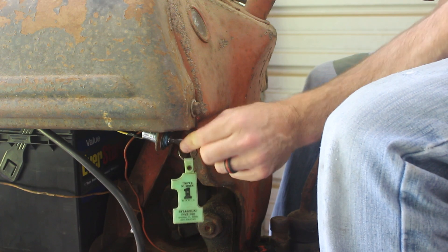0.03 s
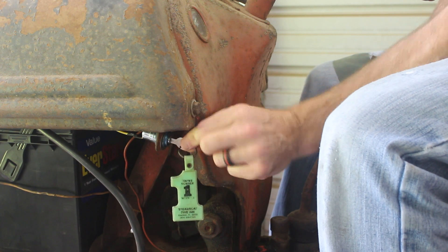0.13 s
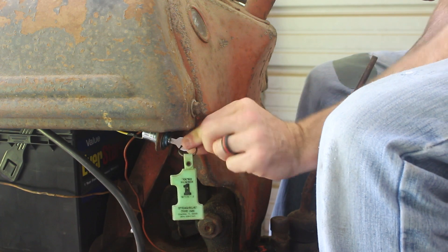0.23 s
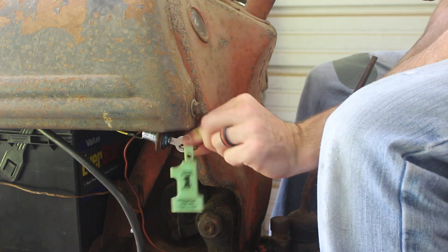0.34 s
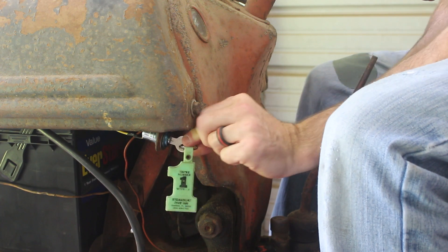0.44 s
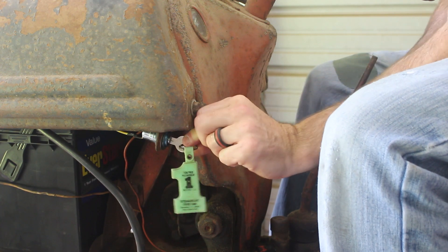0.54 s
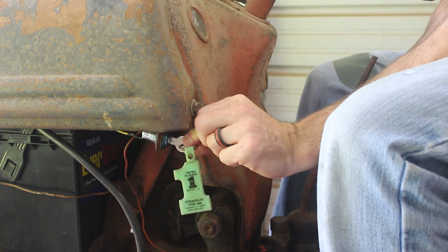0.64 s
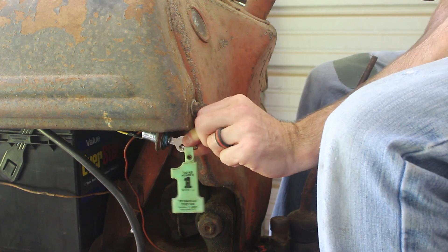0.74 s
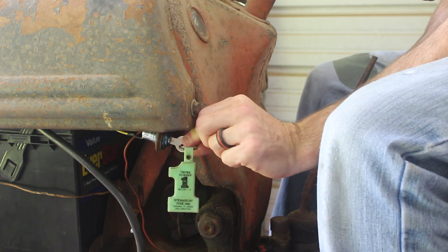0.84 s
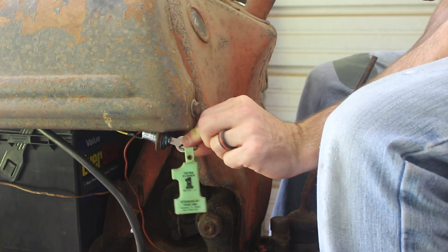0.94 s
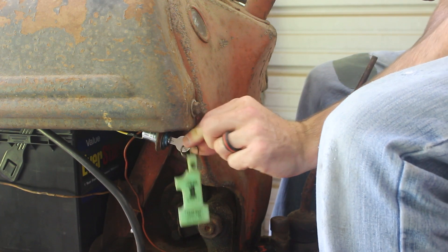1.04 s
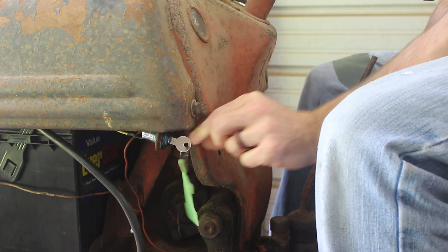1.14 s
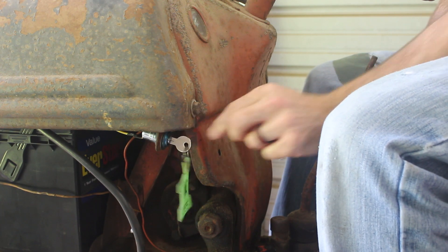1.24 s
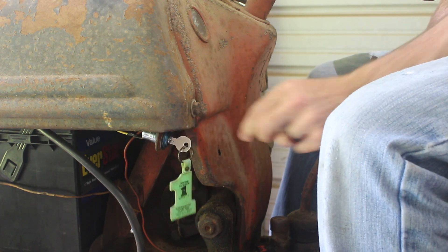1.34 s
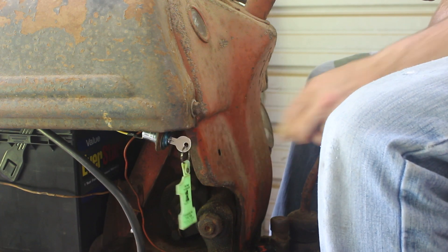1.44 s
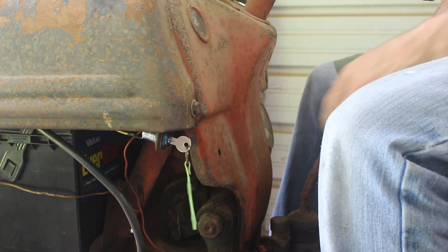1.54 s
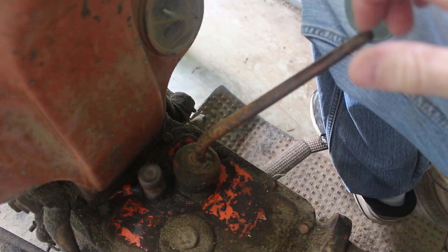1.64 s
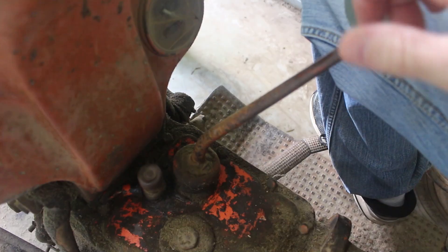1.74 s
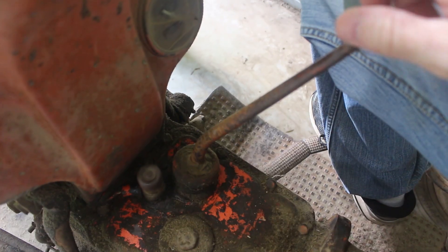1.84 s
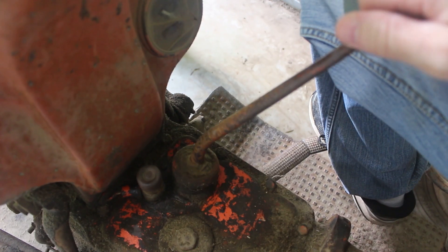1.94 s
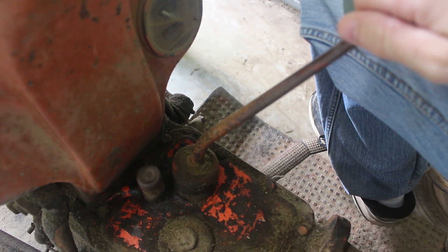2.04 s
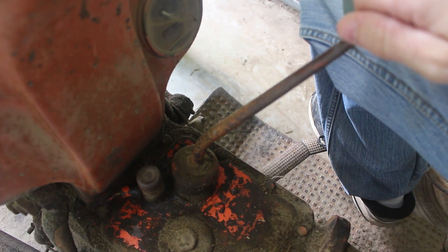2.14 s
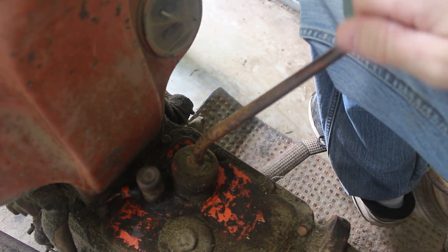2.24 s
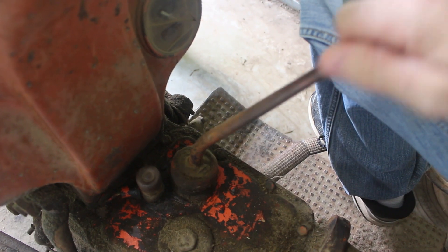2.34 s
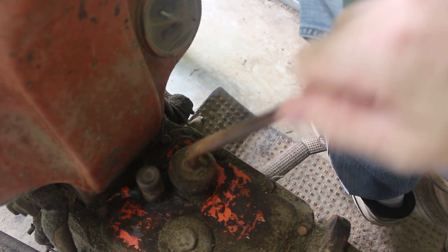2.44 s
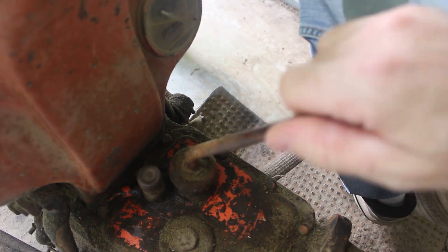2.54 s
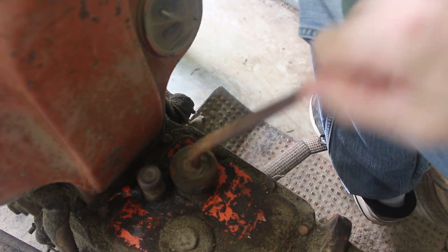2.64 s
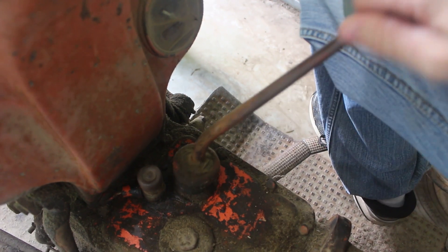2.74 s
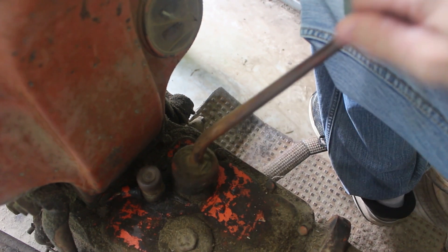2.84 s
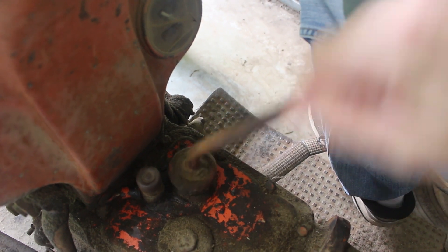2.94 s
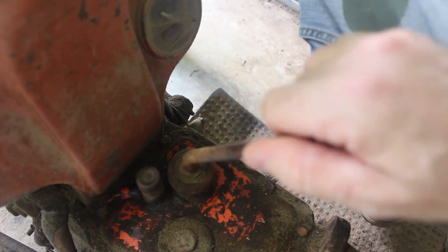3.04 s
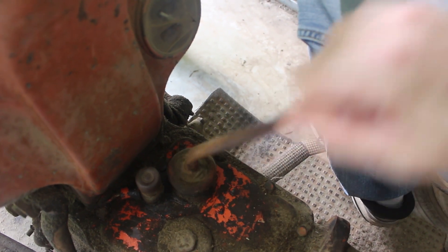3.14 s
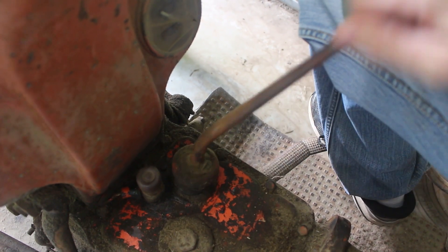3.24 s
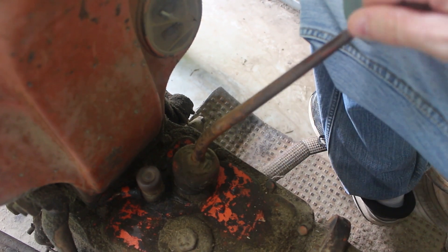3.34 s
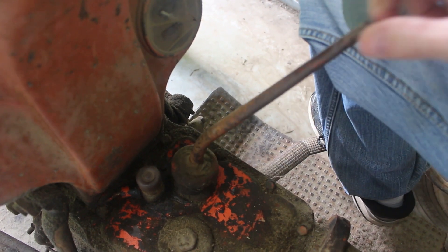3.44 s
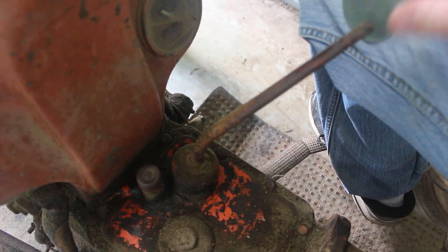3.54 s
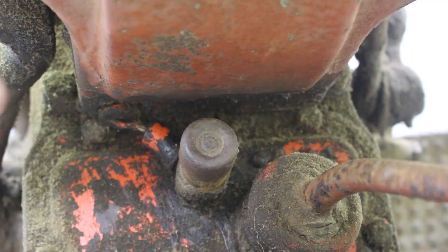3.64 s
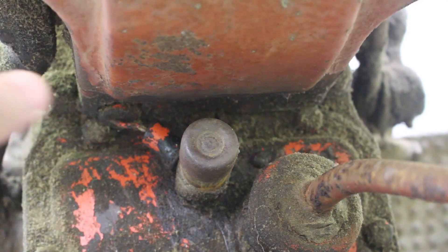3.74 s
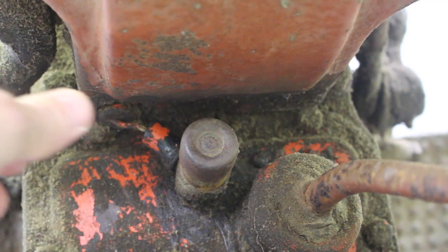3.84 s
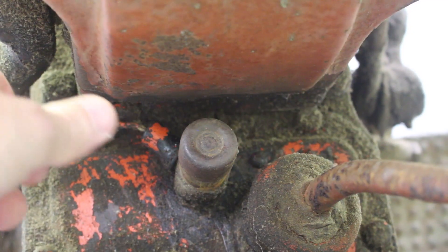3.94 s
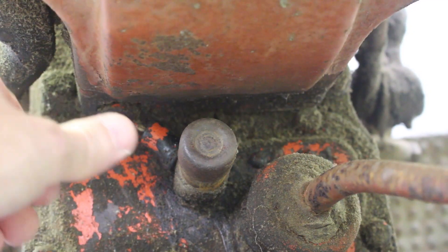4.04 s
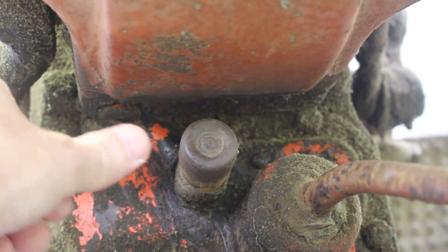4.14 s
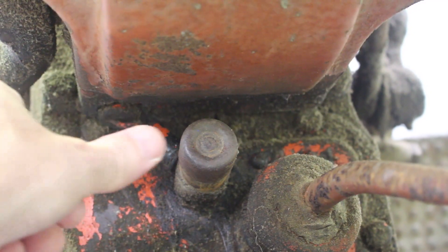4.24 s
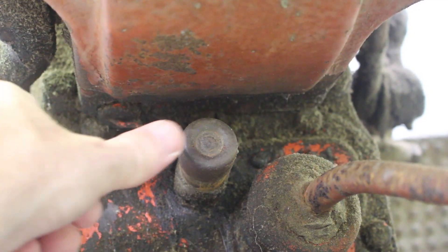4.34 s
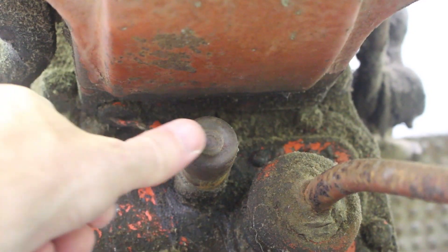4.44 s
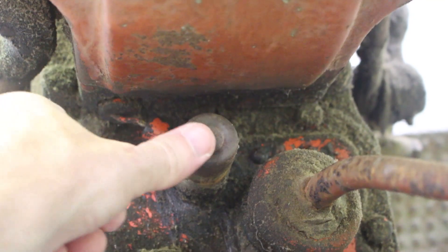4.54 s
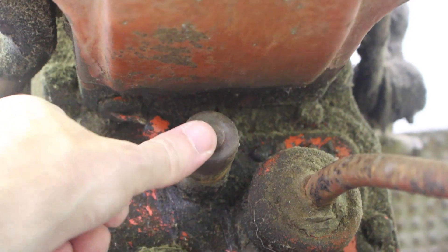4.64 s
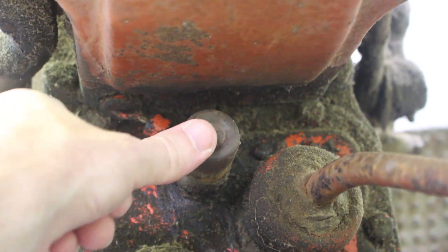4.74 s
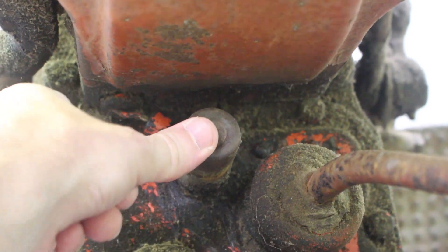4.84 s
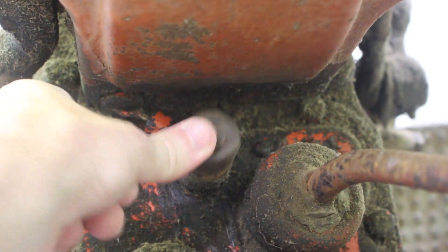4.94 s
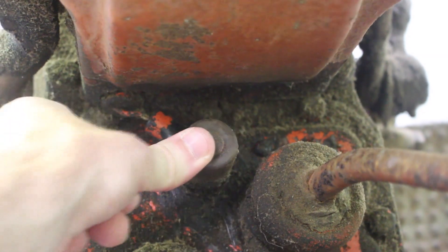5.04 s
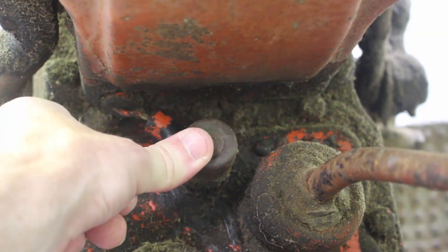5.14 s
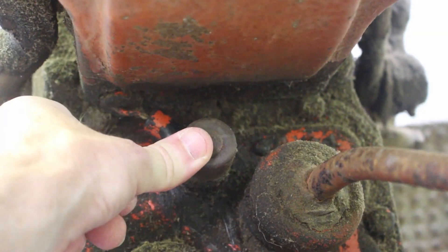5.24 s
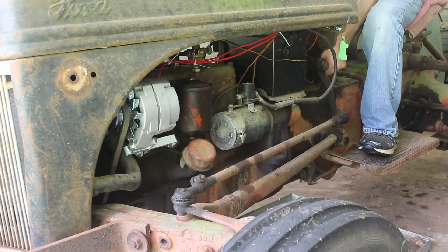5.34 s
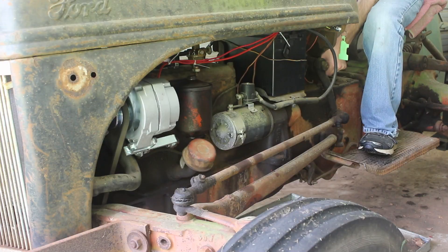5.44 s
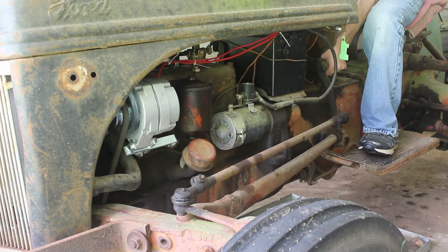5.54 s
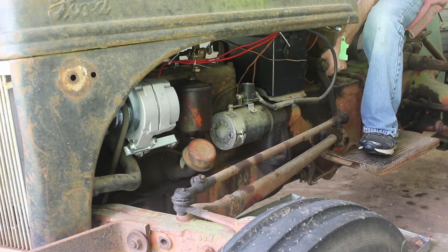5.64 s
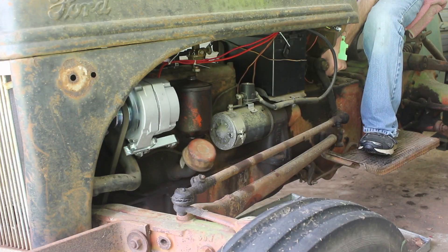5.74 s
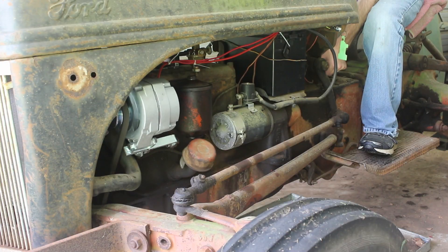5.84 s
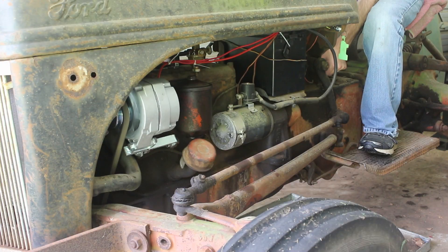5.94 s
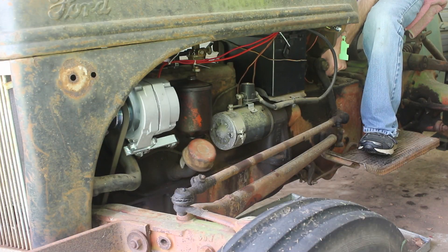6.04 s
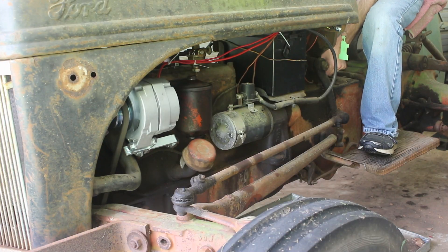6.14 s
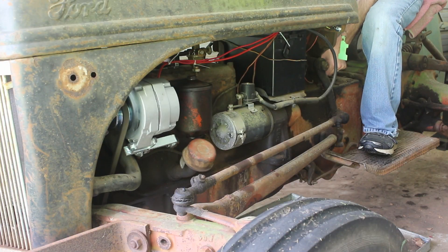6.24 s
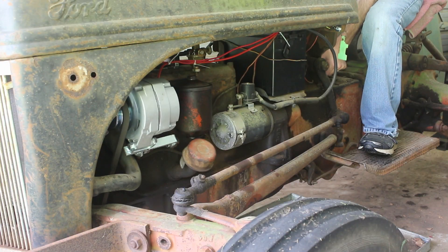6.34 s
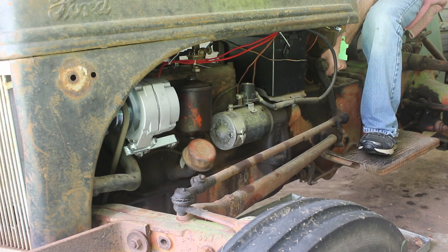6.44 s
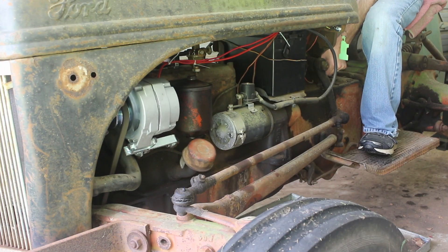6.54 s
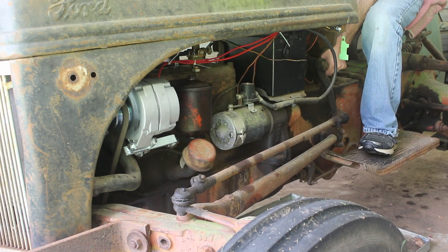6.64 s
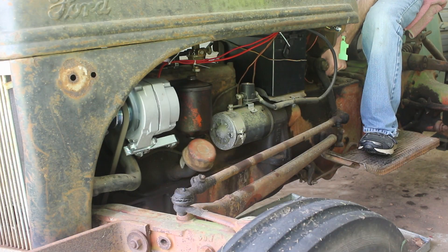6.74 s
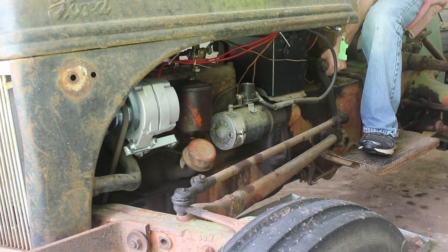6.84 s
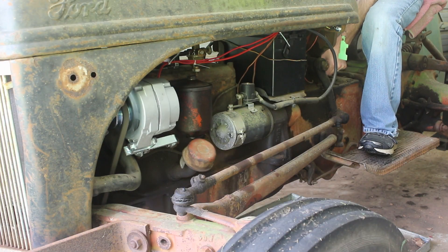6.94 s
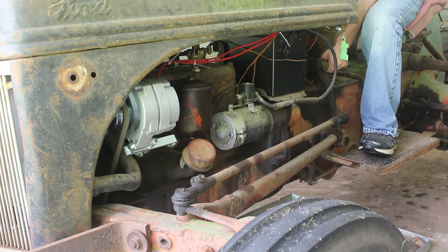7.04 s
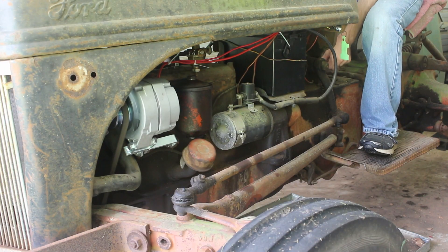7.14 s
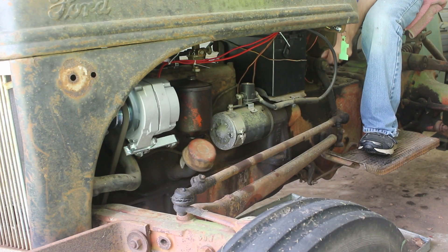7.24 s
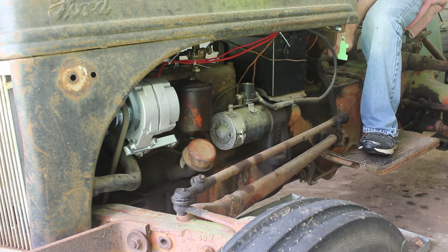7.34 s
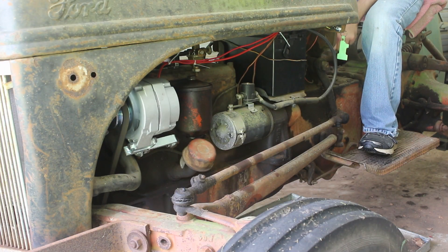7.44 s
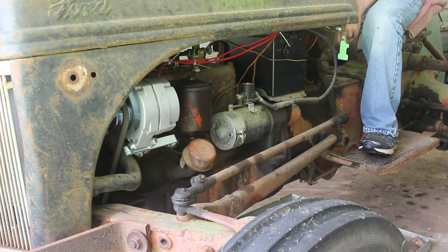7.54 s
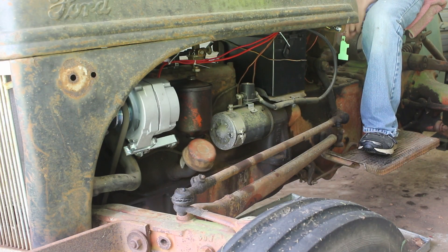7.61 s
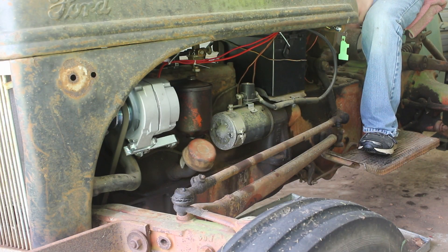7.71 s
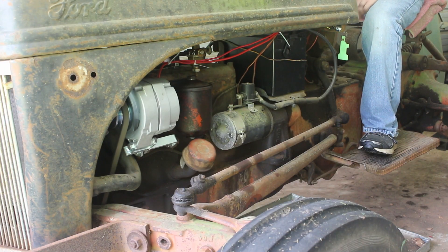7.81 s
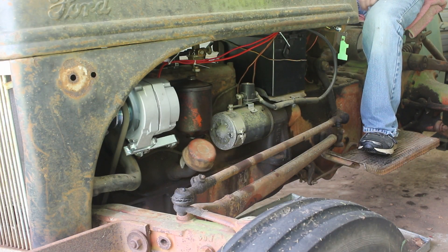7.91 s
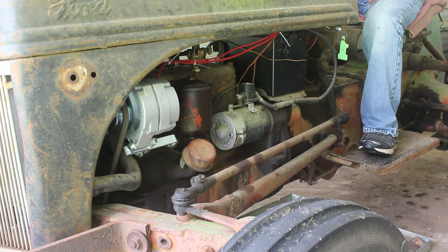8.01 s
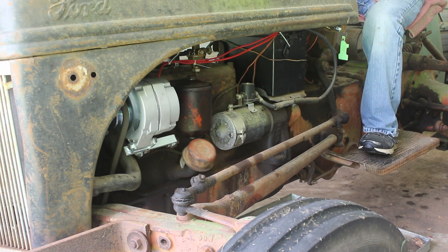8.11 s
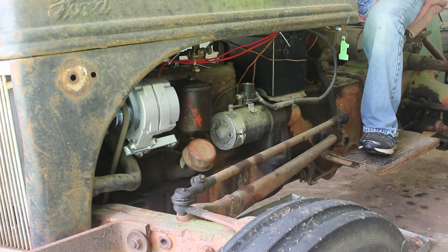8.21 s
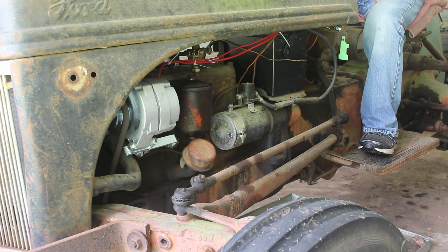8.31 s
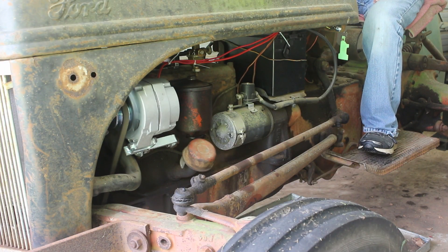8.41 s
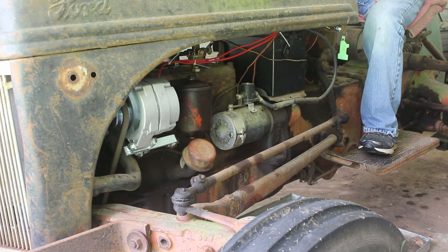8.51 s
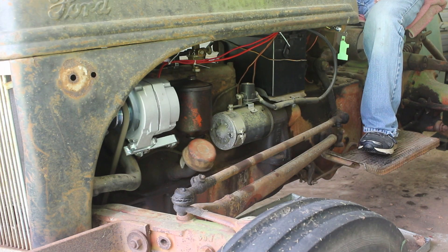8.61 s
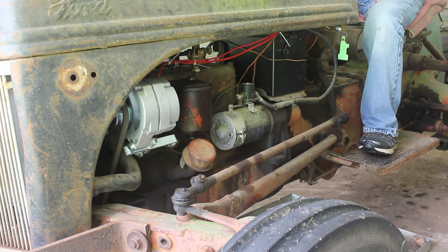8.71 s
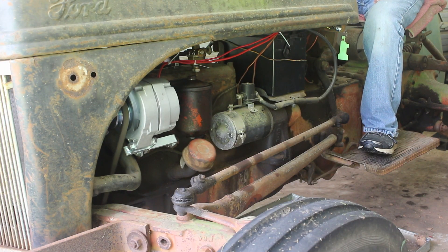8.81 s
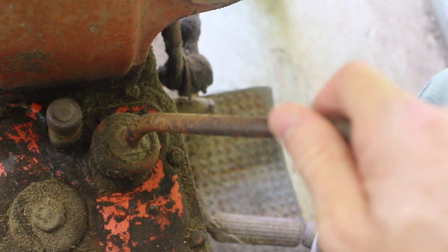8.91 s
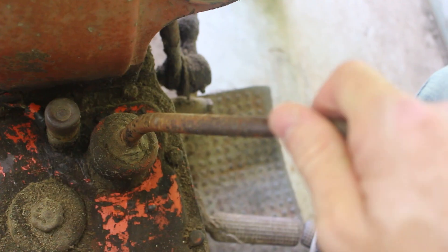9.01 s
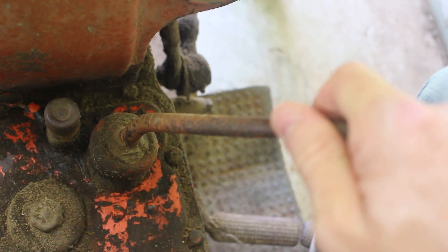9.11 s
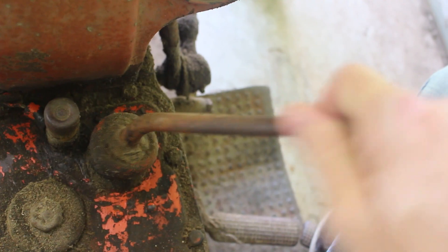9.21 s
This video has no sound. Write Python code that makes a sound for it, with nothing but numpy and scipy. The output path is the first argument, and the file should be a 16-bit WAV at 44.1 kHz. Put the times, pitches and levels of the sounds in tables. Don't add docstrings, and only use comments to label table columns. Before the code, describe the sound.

Faint key clacks, loud loose lever knocks, a button click, then harsh starter grinding and a clattering four-cylinder tractor engine running fast outdoors.

```python
import sys
import numpy as np
from scipy import signal
from scipy.fft import rfft, irfft
from scipy.io import wavfile
from scipy.ndimage import uniform_filter1d

SR = 44100
rng = np.random.default_rng(int(sys.argv[2]) if len(sys.argv) > 2 else 0)


def output_pcm(signal):
    pcm = np.clip(np.atleast_2d(signal).T, -1, 1) * 32767
    wavfile.write(sys.argv[1], SR, np.round(pcm).astype(np.int16))


def invert_db(x):
    u = np.asarray(x, float) / 20
    return 10 ** u


N = 408807

# time in seconds, firing rate per second, throttle in dB, misfire in dB.
ENGINE_RUN = [(6.6, 15.4, -43, -50), (6.7, 23, 1, -66), (6.97, 35.5, 3.5, -48), (7.11, 41, 6.5, -45),
              (7.16, 41, -11, -38), (7.55, 38, -12.5, -36), (7.88, 39, 1, -31), (7.96, 40, -0.5, -48),
              (8.6, 41, 0, -61), (9.0, 41.8, -1, -33), (9.27, 40.5, 0.5, -35)]
FOLLOW = {"pulse": (-30, 0.53, .6), "bark": (-24, 1.5, .01), "clatter": (-21, 0.088, 0.069),
          "hiss": (-6.5, 0.14, -0.46)}
# frequency in Hz, width in Hz, level in dB.
PIPE_MODES = [(113.6, 17, -7), (164, 43, 3.5), (264, 37, -2.5), (399.6, 20.6, -7.5)]
CYLINDERS_DB = [
    5,
    -1,
    -3,
    -1,
]
# peak time in seconds, level over an even firing in dB.
BARKS = [(7.8, 4), (7.92, 8), (7.975, 8), (8.053, 8), (8.25, 9.5), (8.445, 12), (8.545, 7.5), (8.64, 8),
         (8.735, 8), (8.845, 10.5), (8.935, 11), (9.105, 6), (9.235, 8.5)]
# time in seconds, thud level in dB.
SKIPS = [
    (8.13, -21),
    (8.33, -18),
    (8.821, -10.5),
]
# frequency in Hz, level in dB per Hz.
CLATTER_SPECTRUM = [(110, -5), (180, -1), (213, -12), (262, -3), (334, -4.5), (683, -5.5), (736, -8.5),
                    (994, -7), (1950, -12.5), (2230, -16.5), (3700, -18), (4300, -21.5), (12800, -44),
                    (15550, -50), (15700, -75)]
# frequency in Hz, width in Hz, level in dB.
BLOCK_MODES = [(669, 9.3, -15.5), (925, 40, -17), (1127, 25, -25), (1314, 28, -38), (1480, 71, -19),
               (1770, 15, -43), (1870, 11, -26), (2960, 10, -42), (3930, 26, -23)]
# time in seconds, peak in dB, ring in Hz.
VALVES = [(6.691, -31, 11800), (6.7805, -27, 7300), (6.8543, -31, 12200), (6.9182, -29, 7010),
          (6.9775, -29.5, 8000), (6.9785, -37, 11300), (7.0299, -31.5, 8500), (7.083, -38, 13100),
          (7.2763, -37, 6960), (7.4789, -33, 6800), (7.5851, -41, 6740), (7.6739, -39, 7200),
          (7.7978, -35, 8160), (7.9523, -27.5, 7050), (8.0506, -35, 8600), (8.2496, -34, 7060),
          (8.4422, -33, 7540), (8.539, -31, 8100), (8.6367, -29, 7500), (8.7325, -45, 7240),
          (8.8413, -48, 7450), (8.9306, -45, 7860), (8.98, -47, 8180), (9.2309, -31.5, 7120)]
# time in seconds, grind level in dB.
CRANK = [
    (5.42, -14.5),
    (5.6, -19.5),
    (5.75, -21.5),
    (5.9, -20.5),
    (6.1, -18),
    (6.56, -21),
    (6.75, -46),
]
# peak time in seconds, level in dB.
CLASHES = [(5.515, -45), (5.55, -42), (5.635, -27), (5.665, -23.5), (5.695, -22), (5.718, -38),
           (5.785, -20.5), (5.812, -26.5), (5.84, -30), (5.9, -32), (5.951, -23.5), (6.01, -21.5),
           (6.041, -21), (6.065, -18), (6.094, -23.5), (6.15, -25.5), (6.166, -18), (6.255, -15.5),
           (6.347, -19), (6.437, -18), (6.527, -22.5), (6.55, -32), (6.582, -24.5), (6.635, -29),
           (6.694, -20)]
# frequency in Hz, level in dB per Hz.
GRIND_SPECTRUM = [(110, -24), (250, -12), (700, -2.5), (1500, -9.5), (2400, -16.5), (4000, -24.5),
                  (6800, -27), (7600, -53), (8800, -51), (10000, -34), (11200, -35), (12300, -56),
                  (15000, -58), (15600, -59), (15700, -85)]
# frequency in Hz, width in Hz, level in dB.
HOUSING_MODES = [(265, 29, -13.5), (615, 36, -12), (690, 22, -26), (908, 18, -15.5), (1280, 23, -30),
                 (1400, 36, -20), (1510, 63, -13), (1646, 14, -17), (2690, 30, -18)]
# start in seconds, length in seconds, start in Hz, end in Hz, level in dB.
MESH = [(5.47, 0.048, 4370, 4400, -34), (5.515, 0.078, 615, 702, -13.5), (5.505, 0.036, 840, 940, -15),
        (5.585, 0.19, 712, 693, -20.5), (5.61, 0.044, 890, 965, -16), (5.675, 0.056, 970, 914, -13),
        (5.73, 0.058, 970, 970, -23), (5.71, 0.076, 1385, 1400, -27), (5.765, 0.076, 1127, 1116, -15.5),
        (5.825, 0.05, 1114, 1070, -23), (5.795, 0.048, 1658, 1640, -23), (5.765, 0.13, 563, 562, -15.5),
        (5.86, 0.071, 574, 556, -17), (5.92, .12, 560, 494, -25), (6.045, 0.04, 600, 644, -25),
        (6.07, .06, 690, 760, -21), (6.15, 0.095, 746, 675, -18), (6.15, 0.056, 1287, 1227, -21),
        (6.225, 0.13, 705, 710, -21), (6.24, 0.029, 1510, 1530, -17), (6.325, 0.042, 616, 675, -13.5),
        (6.33, 0.028, 1500, 1470, -15), (6.36, 0.08, 685, 702, -17.5), (6.445, 0.049, 706, 690, -18),
        (6.49, 0.15, 712, 705, -18), (6.51, 0.23, 930, 925, -29), (6.69, .04, 6320, 6130, -27)]
# time in seconds, whir in Hz, level in dB.
COAST = [
    (6.69, 271.7, -16.5),
    (6.88, 308.3, -14.5),
    (6.93, 315.3, -31),
    (7.12, 327.6, -31),
    (7.32, 302.4, -15),
    (7.52, 284.2, -18),
    (7.8, 264.5, -15.5),
    (7.93, 254.6, -18),
    (8.1, 242.2, -33),
]
# multiple of the whir, level in dB, loudest time in seconds, fade in dB per second.
COAST_PARTIALS = [(1.36, -23.5, 7.52, 15), (1.72, -21, 6.85, 43), (2.05, -22, 6.85, 55),
                  (2.37, -28, 7.3, 14), (2.72, -25.5, 7.0, 54), (3.06, -21.5, 6.9, 55),
                  (3.06, -25.5, 7.3, 57)]
# time in seconds, peak in dB, loudest ring in Hz, treble over the rest in dB.
PINION = [
    (5.413, 8.8, 3430, 15.5),
    (5.452, 4.1, 550, -18.5),
]
# time in seconds, level in dB, frequency in Hz, t60 in seconds.
PINGS = [
    (5.4128, -2.5, 3300, 0.021),
    (6.166, -11, 1480, .05),
    (6.343, -8, 650, .05),
    (6.4425, -1.5, 690, 0.058),
    (7.47, -28, 5780, .04),
    (7.554, -27, 5293, .04),
    (7.765, -24, 5650, .04),
    (7.869, -25, 5640, .04),
    (7.971, -23, 5626, .04),
]
# time in seconds, peak in dB, loudest ring in Hz, treble over the rest in dB.
STICK = [(2.376, -12, 1580, -13), (2.383, -7.5, 534, -15), (2.413, -2.5, 637, -9.5), (2.438, -19, 815, 1),
         (2.454, 2.5, 2420, -12), (2.498, -15, 438, -18), (2.575, -5, 1520, -15), (2.640, -6, 890, -26),
         (2.646, -9, 890, -24), (2.694, -12, 1260, -24), (2.712, 3.5, 510, -22), (2.721, 5.5, 2590, -8.5),
         (2.735, -17, 700, -20), (2.760, -9, 1400, -13), (2.799, 1.5, 895, -16.5), (2.82, -12, 950, -21),
         (2.905, -16, 700, -25), (2.925, 4.5, 597, -14), (2.969, 7.5, 960, -6), (2.985, -4, 910, -10),
         (3.041, -7, 705, -11), (3.046, -7, 2500, -16), (3.06, 3.5, 640, -16), (3.072, -1.5, 700, -24),
         (3.091, -7, 634, -16), (3.174, -4.5, 654, -17), (3.215, 1.5, 876, -35), (3.234, -4, 960, -17),
         (3.25, 5, 2470, -8), (3.256, -4.5, 1000, -12), (3.279, -8, 2400, -12), (3.288, -2.5, 1000, -13),
         (3.327, -9, 900, -16), (3.349, -5.5, 645, -24), (3.425, -22, 900, -27), (3.442, -23, 786, -26),
         (3.467, 1.5, 1030, -21), (3.476, -16, 880, -23), (3.557, -32, 900, -25)]
# time in seconds, peak in dB, loudest ring in Hz, treble over the rest in dB.
KEY = [(0.025, -22.5, 1420, -6), (0.185, -30, 1240, -6), (0.285, -30, 890, -32), (0.304, -26.5, 1000, -34),
       (0.326, -28, 890, -35), (0.393, -21, 990, -15), (0.407, -10, 2080, 3.5), (1.152, -22, 896, -22),
       (1.172, -24.5, 770, -28), (1.278, -24.5, 915, -11), (1.852, -31.5, 1405, -18), (2.06, -30, 940, -27),
       (2.311, -31.5, 543, -65)]
# time in seconds, peak in dB, loudest ring in Hz, treble over the rest in dB.
BUTTON = [
    (4.618, -21, 635, -37),
    (4.825, -30.5, 471, -21),
    (4.996, -22.5, 960, -3),
    (5.038, -10.5, 900, -31),
    (5.043, -21, 970, -43),
    (5.067, -15.5, 530, -33),
    (5.331, -45, 1010, 3),
]
# frequency in Hz, level in dB.
GEARBOX_MODES = [(260, -14), (506, 7), (690, 5), (930, -0.5), (1540, 5), (1950, -20), (2600, 6),
                 (3550, 9.5), (4400, -13)]
# frequency in Hz, level in dB per Hz.
KNOCK_SPECTRUM = [(88, -52), (150, -11), (923, -3), (2810, -7), (4000, -12), (5790, -14), (7320, -28.5),
                  (10400, -28.5), (16000, -42)]
# time in seconds, level in dB,
# frequency in Hz, t60 in seconds.
THUMPS = [(4.605, -29.5, 301, 0.087), (4.657, -29, 265, .07), (4.618, -15.5, 231, 0.11),
          (4.626, -21.5, 56.6, 0.24), (4.65, -26, 27.7, 0.4), (5.07, -11.5, 312, 0.011),
          (5.075, -23, 35, 0.11), (4.735, -36, 270, .06), (4.765, -42, 338, .06), (4.808, -35, 270, .05),
          (4.84, -40, 210, .12), (5.46, -22.5, 119, 0.2), (5.435, -16, 358, 0.24), (5.44, -17, 273, 0.19),
          (5.99, -16.5, 269, 0.29), (6.07, -21, 238, 0.31), (6.09, -18, 370, 0.17), (6.43, -27, 258, 0.23)]
# start in seconds, length in seconds, centre in
# Hz, width in Hz, level in dB.
SCRAPES = [(2.808, 0.053, 2900, 300, -45), (2.855, .05, 2300, 300, -44), (5.03, .012, 12800, 600, -52),
           (5.922, .12, 64.81, 120, -37), (6.027, 0.56, 60, 80, -48), (1.171, 0.28, 574, 25, -49),
           (1.2, 0.25, 488, 40, -49.5), (3.038, 0.076, 1500, 1400, -35), (3.22, .05, 1200, 1200, -25),
           (0.279, 0.074, 960, 555.6, -41.5), (0.38, 0.15, 972.2, 555.6, -37.5),
           (1.151, 0.21, 1300, 1111, -47.5), (5.04, .035, 5100, 140, -47), (5.0, 0.049, 5800, 500, -49),
           (1.117, .05, 1200, 1100, -49), (1.848, 0.16, 1150, 972, -51), (4.596, 0.035, 961.2, 864, -47),
           (4.633, 0.065, 6700, 1667, -42), (5.001, 0.065, 1300, 900, -42), (5.004, 0.055, 3200, 500, -46),
           (5.035, 0.014, 5900, 500, -39.5)]
# start in seconds, frequency in Hz, level in dB.
CHIPS = [(.67, 4050, -39), (.72, 3800, -43), (1.17, 3800, -47), (1.22, 3720, -39), (1.67, 3660, -37)]
# time into it in seconds, length in seconds, start in Hz, end in Hz, level in dB.
SONG = [
    (-.035, 0.04, 2554, 2510, -49.5),
    (-.006, 0.0183, 2650, 3250, -41),
    (0.056, .035, 1783, 2520, -49.5),
    (0.086, 0.032, 2530, 2584, -45.5),
    (0.163, .026, 3600, 2910, -39),
    (.204, 0.0265, 3640, 4550, -42),
    (0.224, 0.095, 4580, 4540, -54),
]
# start in seconds, list of its notes.
PHRASES = [
    (3.626, SONG[1:]),
    (3.954, SONG[:6]),
    (4.29, SONG[:2]),
]
CUTS_S = [
    1.7,
    3.63,
    5.33,
]
# traffic in dB, wind in dB.
PLACES = [
    (-44.5, -71),
    (-91, -46),
    (-61.5, -43),
    (-59, -54),
]
# nearest time in seconds, level in dB.
PASSES = [
    (1.3, -45.5),
    (2.8, -54),
]
# peak time in seconds, level in dB.
GUSTS = [
    (2.8, -59),
    (3.45, -42),
    (4.95, -66),
    (5.32, -30),
]
# time in seconds, cicada swell in dB, rustle of hand and seat in dB.
AIR = [
    [(0.0, -63, -37.5), (1.022, -51.5, -51.5), (1.695, -64.5, -41)],
    [(1.705, -66, -53), (3.201, -55.5, -48), (3.625, -62.5, -52)],
    [(3.635, -63, -45), (4.313, -54.5, -45.5), (5.4, -66.5, -49)],
]
# frequency in Hz, level in dB per Hz.
YARD_SPECTRUM = [(40, -7), (300, -17), (1500, -29.5), (3000, -32), (6000, -33.5), (6900, -14), (8000, -14),
                 (8450, -31.5), (10600, -30), (11200, -31.5), (15900, -33.5), (16200, -60)]
# frequency in Hz, level in dB per Hz.
CICADA_SPECTRUM = [(1760, -44), (3000, -15), (3710, 3), (4690, -3), (5120, 2), (5960, -4), (6500, -8),
                   (8450, -29), (14300, -120)]
# frequency in Hz, level in dB per Hz.
RUSTLE_SPECTRUM = [(240, -40), (400, -10), (502, -3.5), (634, -4), (1210, -4), (3200, -14.5), (4160, -31),
                   (7040, -120)]
# frequency in Hz, level in dB per Hz.
TRAFFIC_SPECTRUM = [(24, -46), (40, -6), (85, -6.5), (130, 5.5), (209, -5.5), (355, -8), (437, -36),
                    (620, -63), (1060, -120)]

IDLE_PER_S, STRONG_S = 40, 8.444
BARK_S, SHAKE = 0.08, 0.12
SKIP_HZ, SKIP_T60_S = 59.3, 0.2
SLAM_RISE_S, SLAM_T60_S = 0.023, 0.12
GRIND_TREBLE_DB, GRIT_PER_S = -10, 76
CHIP_S, CHIP_DROP_HZ = 0.02, 80
AIR_DB, PASS_DB_PER_S, GUST_DB_PER_S = -55, 38, 70


def evened(x):
    return x / np.sqrt(np.mean(x ** 2) + 1e-20)


def add(mix, s, sound):
    part = mix[round(s * SR):][:len(sound)]
    part += sound[:len(part)]


def until(x, s):
    return x * (np.arange(N) < s * SR)


def columns(rows):
    s, *cols = np.transpose(rows)
    t = np.arange(N) / SR
    on = uniform_filter1d(1. * (t >= s[0]) * (t <= s[-1]), size=200)
    return [np.interp(t, s, c) for c in cols] + [on]


def swells(rows, fall_db_per_s):
    t = np.arange(N) / SR
    return sum(invert_db(db - fall_db_per_s * abs(t - s)) for s, db in rows)


def coloured(x, points, lo_hz=0, hi_hz=SR):
    hz = np.fft.rfftfreq(len(x), 1 / SR)
    f, db = np.transpose(points)
    z = rfft(x) * invert_db(np.interp(np.log(hz + 1), np.log(f + 1), db, left=-100, right=-100))
    band = irfft(z * (hz > lo_hz) * (hz < hi_hz), len(x))
    return irfft(z, len(x)) / np.sqrt(np.mean(band ** 2) + 1e-20)


def patchy(patchy_db):
    a, b, patch = rng.standard_normal((N // 128 + 5, 257, 3)).T
    patch = uniform_filter1d(patch, size=5, axis=0)
    patch = evened(uniform_filter1d(patch, size=14, axis=1))
    return signal.istft((a + 1j * b) * invert_db(patchy_db * patch), nperseg=512, noverlap=384)[1][:N]


def split(x, hz):
    low = signal.sosfiltfilt(signal.butter(2, hz, fs=SR, output="sos"), x)
    return low, x - low


def resonate(x, hz, width_hz):
    turn = np.exp(2j * np.pi * np.cumsum(hz * np.ones(len(x))) / SR)
    r = np.exp(-np.pi * width_hz / SR)
    return 2 * (turn * signal.lfilter([1 - r], [1, -r], x / turn + 1e-18)).real


def modes(x, rows):
    return sum(invert_db(db) * evened(resonate(x, hz, width_hz)) for hz, width_hz, db in rows)


def tail(x, t60_s, gap_s):
    t = np.arange(SR // 2) / SR
    taps = rng.choice([-1., 1.], len(t)) * (rng.random(len(t)) < .05)
    taps = taps * invert_db(-60 * t / t60_s) * (t > gap_s)
    return signal.oaconvolve(x, taps / np.linalg.norm(taps))[:N]


def glides(rows, fuzz, width_hz):
    out = np.zeros(N)
    for s, length_s, start_hz, end_hz, db in rows:
        hz = np.linspace(start_hz, end_hz, round(length_s * SR))
        pure = np.sqrt(2) * np.sin(2 * np.pi * np.cumsum(hz) / SR)
        blur = evened(resonate(rng.standard_normal(len(hz)), hz, width_hz))
        tone = (1 - fuzz) * pure + fuzz * blur
        add(out, s, invert_db(db) * tone * signal.windows.tukey(len(hz), .4))
    return out


def exhaust_bark(puffs, on):
    bark = np.zeros(N)
    for k, (hz, width_hz, db) in enumerate(PIPE_MODES):
        ring = resonate(resonate(puffs, hz, width_hz), hz, 1.3 * width_hz)
        bark += (-1) ** k * invert_db(db) * ring / width_hz
    turbulence = evened(resonate(rng.standard_normal(N), 81, 83))
    bark = evened(bark) + .5 * on * turbulence
    return bark / np.sqrt(uniform_filter1d(bark ** 2, size=SR // 4) + 1e-12)


def engine_clatter(turns, count, strength, hiss_db):
    throb = 1 + 0.11 * uniform_filter1d(strength * np.exp(-(turns % 1) / 0.12), size=150)
    loose = np.minimum(rng.exponential(1, 400), 2)[count % 400] ** 1.5
    loose = loose * np.exp(-((turns + .3) % 1) / .35)
    rattle = 1 + .27 * uniform_filter1d(loose, size=120)
    shake = patchy(1.2)
    body = coloured(shake, CLATTER_SPECTRUM, 625, 2100) + modes(shake, BLOCK_MODES)
    low, high = split(body, 3050)
    mid, top = split(high, 7500)
    hiss = evened((mid + .8 * top * rattle ** 0.94) * throb * rattle)
    return low * throb ** 0.97 + invert_db(hiss_db) * hiss


def valve_ticks():
    out, t = np.zeros(N), np.arange(SR // 20) / SR
    for s, db, hz in VALVES:
        tap = rng.standard_normal(len(t))
        clack = evened(resonate(resonate(tap, hz, 1200), hz, 1200))
        clack += 0.5 * evened(resonate(resonate(tap, 9200, 6000), 9200, 6000))
        add(out, s, invert_db(db - 1.5 - 60 * t / 0.16) * np.minimum(t / 0.0013, 1) * clack)
    return out


def engine():
    rate_per_s, throttle_db, misfire_db, on = columns(ENGINE_RUN)
    speed_db = 20 * np.log10(rate_per_s / IDLE_PER_S)
    pulse_db, bark_db, clatter_db, hiss_db = (
        db + a * throttle_db + b * speed_db for db, a, b in FOLLOW.values())
    turns = np.cumsum(rate_per_s) / SR
    turns -= turns[round(STRONG_S * SR)]
    count = np.floor(turns).astype(int)

    pulses = 1.4 * np.cos(4 * np.pi * turns) + 0.59 * np.cos(2 * np.pi * turns)
    uneven = sum(np.cos(2 * np.pi * order * (turns - 2 * order)) for order in (1.25, 1.5, 1.75))
    pulses = invert_db(pulse_db) * pulses + invert_db(misfire_db) * uneven

    scatter_db = 1.2 * rng.uniform(-1, 1, 400)[count % 400]
    strength = invert_db(np.take(CYLINDERS_DB, count % 4) + scatter_db)
    puffs = strength * (np.diff(count, prepend=count[0]) > 0) * on
    kick, arch = np.ones(N), signal.windows.hann(round(BARK_S * SR))
    for s, db in BARKS:
        add(kick, s - BARK_S / 2, (invert_db(db) - 1) * arch)
    bark = invert_db(bark_db - 6.5) * exhaust_bark(puffs, on) * kick

    clatter = invert_db(clatter_db - 1.9) * engine_clatter(turns, count, strength, hiss_db)
    clatter = clatter * (1 + SHAKE * (kick - 1))
    skips = thumps([(s, db, SKIP_HZ, SKIP_T60_S) for s, db in SKIPS], 0.019)
    return (pulses + bark + clatter) * on + valve_ticks() + skips


def starter():
    grind_db, on = columns(CRANK)
    force = invert_db(grind_db - 6.5) * on
    slam, t = np.zeros(N), np.arange(SR // 4) / SR
    for s, db in CLASHES:
        fall = invert_db(db - 60 * np.maximum(t - SLAM_RISE_S, 0) / SLAM_T60_S)
        add(slam, s - SLAM_RISE_S, fall * np.minimum(t / SLAM_RISE_S, 1) ** 2)
    noise = patchy(2.5)
    case = modes(noise, HOUSING_MODES)
    low, high = split(coloured(noise, GRIND_SPECTRUM, 650, 3100), 3840)
    mid, top = split(evened(high), 9000)
    chips = (rng.random(N) < GRIT_PER_S / SR) * np.minimum(rng.exponential(1, N), 3)
    tick = t[:600] / 0.0012 * np.exp(-t[:600] / 0.0018)
    grit = 0.72 + signal.oaconvolve(chips, tick)[:N]
    treble = (0.5 * force + 0.65 * slam) * mid + (0.11 * force + 1.0 * slam) * top
    grind = (force + slam) * (low + case) + grit * invert_db(GRIND_TREBLE_DB) * treble
    whine = glides(MESH, .36, 50)
    return grind + whine + invert_db(-8) * tail(whine, .2, .004)


def coast():
    hz, db, on = columns(COAST)
    t, out = np.arange(N) / SR, np.zeros(N)
    partials = [(0.99, db)] + [(m, d - fade * abs(t - s)) for m, d, s, fade in COAST_PARTIALS]
    for multiple, level_db in partials:
        pure = np.sin(2 * np.pi * np.cumsum(multiple * hz) / SR)
        blur = evened(resonate(rng.standard_normal(N), multiple * hz, 4.3))
        out += invert_db(level_db) * (0.83 * pure + 0.17 * blur)
    return out * on


def casting(t, treble_db):
    out = np.zeros(len(t))
    struck, shift = rng.standard_normal((2, len(GEARBOX_MODES)))
    for share, detune, (hz, db) in zip(struck, shift, GEARBOX_MODES):
        fall = invert_db(db + treble_db * hz / 6000 - 60 * t / .026)
        out += np.tanh(share) * fall * np.sin(2 * np.pi * hz * (1 + .05 * detune) * t)
    return out


def knocks(rows, t60_s, ring_db, box_db, wet_db):
    out, t = np.zeros(N), np.arange(SR // 4) / SR
    for s, db, hz, treble_db in rows:
        split_hz = np.clip(3300 + 60 * treble_db, 1100, 2800)
        low, high = split(coloured(rng.standard_normal(len(t)), KNOCK_SPECTRUM), split_hz)
        fall = invert_db(-60 * t / t60_s) + 0.67 * np.exp(-t / 0.0001)
        crack = (evened(low) + invert_db(treble_db + 2.0 - 30 * t / t60_s) * evened(high)) * fall
        ring = invert_db(min(ring_db, 0) - 65 * t / t60_s) * np.sin(2 * np.pi * hz * t)
        sound = crack + ring + invert_db(box_db) * casting(t, treble_db)
        sound = sound * np.minimum(t / 0.00096, 1)
        add(out, s, invert_db(db - 3.5) * sound / abs(sound).max())
    near = tail(out, 0.14, 0.0025)
    far = tail(out, 0.77, 0.0048)
    boom = invert_db(28) * resonate(far, 175.5, 37.0)
    wet = invert_db(wet_db + 4.0) * near + invert_db(wet_db) * (split(far, 3300)[0] + boom)
    return split(out + wet, 217)[1]


def thumps(rows, rise_s):
    out, t = np.zeros(N), np.arange(SR // 2) / SR
    for s, db, hz, t60_s in rows:
        add(out, s, invert_db(db - 60 * t / t60_s) * np.sin(2 * np.pi * hz * t) * np.minimum(t / rise_s, 1))
    return out


def scrapes():
    out = np.zeros(N)
    for s, length_s, hz, width_hz, db in SCRAPES:
        noise = rng.standard_normal(round(length_s * SR))
        rub = evened(resonate(resonate(noise, hz, width_hz), hz, width_hz))
        shape = signal.windows.tukey(len(rub), .6) * np.linspace(1.4, .6, len(rub))
        add(out, s, invert_db(db) * rub * shape)
    return out


def bird():
    chips = [(s, CHIP_S, hz, hz - CHIP_DROP_HZ, db) for s, hz, db in CHIPS]
    song = [(s + into_s, *note) for s, notes in PHRASES for into_s, *note in notes]
    first, second = glides(chips, 0.4, 100), glides(song, 0.2, 80)
    near, far = tail(first, .3, .004), tail(second, .5, .004)
    return until(first + invert_db(-5.0) * near, CUTS_S[0]) + invert_db(-3.0) * second + invert_db(2.0) * far


def yard():
    cicada_db, rustle_db, _ = columns(sum(AIR, []))
    place = np.searchsorted(CUTS_S, np.arange(N) / SR)
    traffic, wind = invert_db(PLACES)[place].T
    traffic = traffic + swells(PASSES, PASS_DB_PER_S)
    wind = wind + until(swells(GUSTS, GUST_DB_PER_S), CUTS_S[2])
    puffs = evened(resonate(resonate(rng.standard_normal(N), 12.0, 12.0), 12.0, 12.0))
    out = invert_db(AIR_DB) * coloured(patchy(1.3), YARD_SPECTRUM, 7460, 8300)
    out += invert_db(cicada_db + 7.0) * coloured(patchy(1.0), CICADA_SPECTRUM)
    out += invert_db(rustle_db - 8.0) * coloured(patchy(3.6), RUSTLE_SPECTRUM)
    out += traffic * coloured(rng.standard_normal(N), TRAFFIC_SPECTRUM)
    return out + wind * puffs


def scene():
    pinion = knocks(PINION[:1], .012, 0, -25, -14) + knocks(PINION[1:], .05, -8, -15, -8)
    motor = engine() + starter() + coast() + pinion + thumps(PINGS, 0.0011)
    hands = knocks(KEY, 0.13, -0.88, 5.7, -7.5)
    hands += until(knocks(STICK, 0.026, 3.5, -6.5, -15.5), CUTS_S[1])
    hands += knocks(BUTTON, 0.029, -0.34, -1.2, -16.0)
    hands += scrapes() + thumps(THUMPS, 0.0019)
    return (motor + hands + bird() + yard())[None]


def band_limit(x):
    return signal.sosfilt(signal.butter(12, 15800, fs=SR, output="sos"), x)


def record(dry):
    return band_limit(np.clip(dry, -1, 1))


dry = scene()
out = record(dry)
output_pcm(out)
```